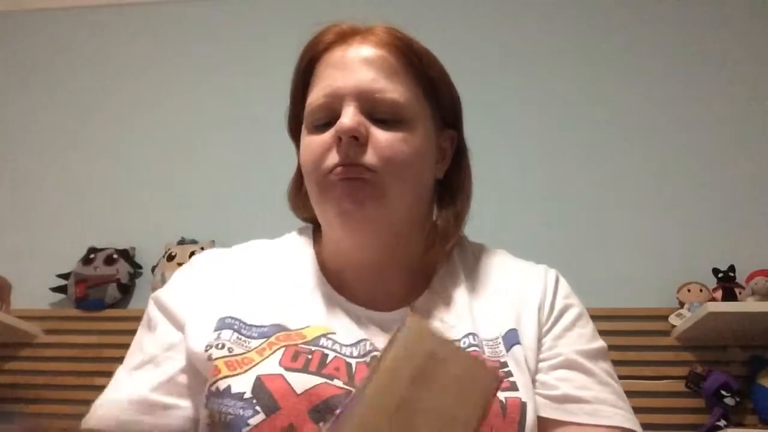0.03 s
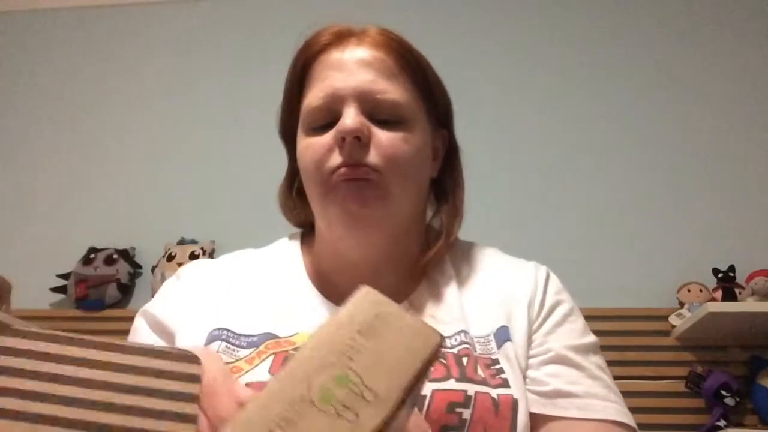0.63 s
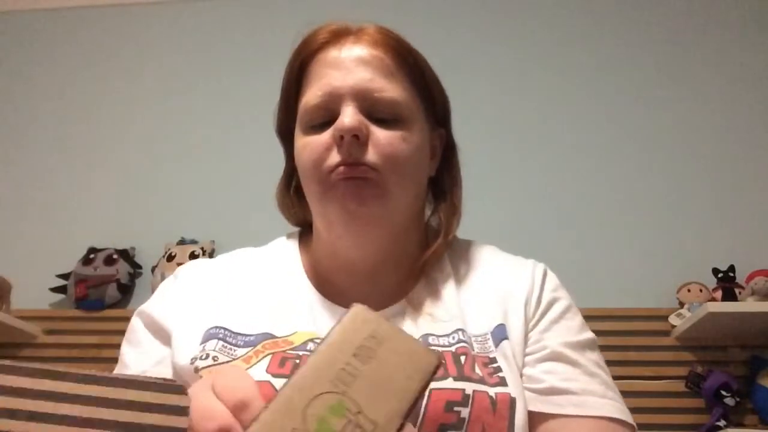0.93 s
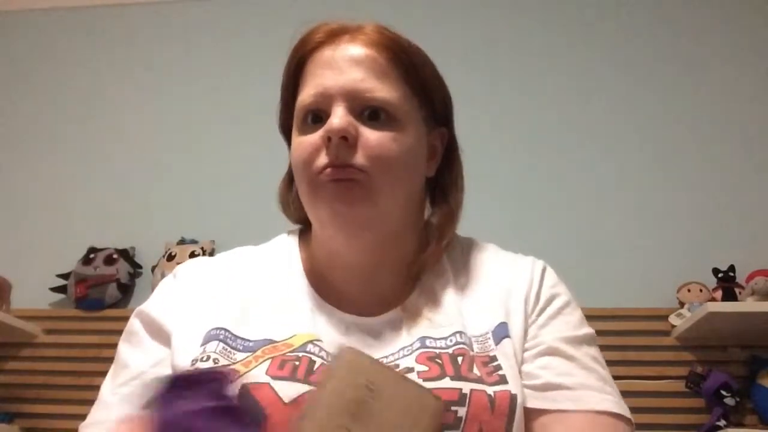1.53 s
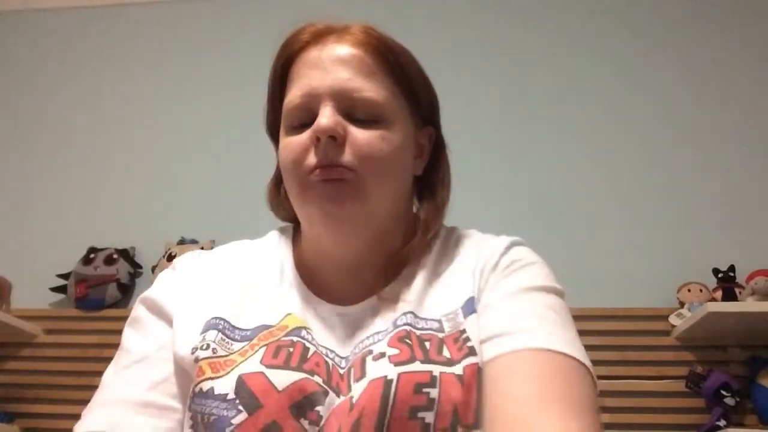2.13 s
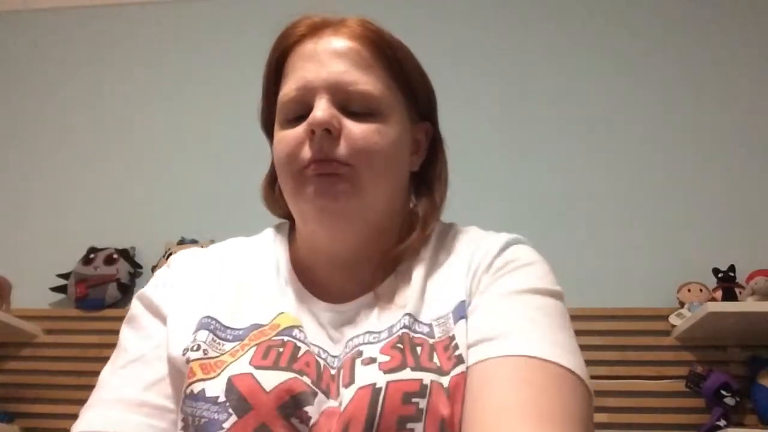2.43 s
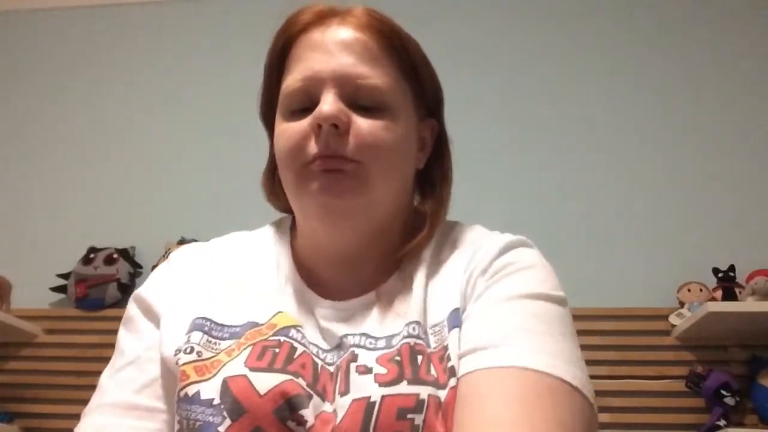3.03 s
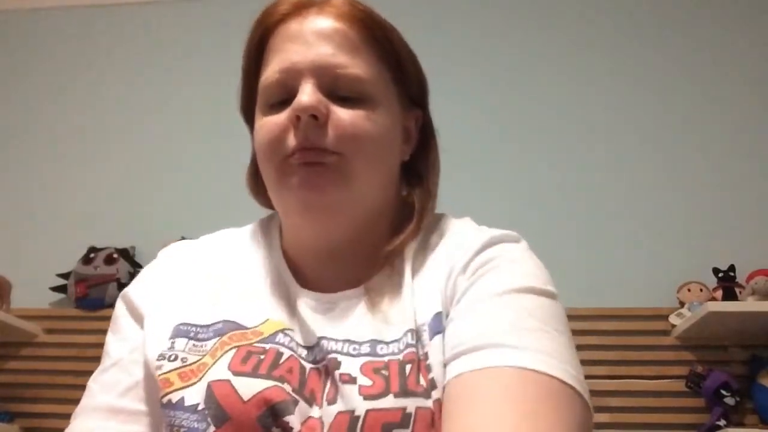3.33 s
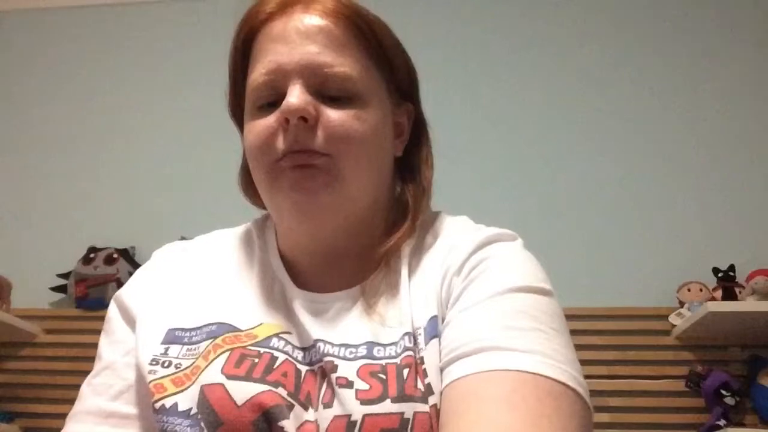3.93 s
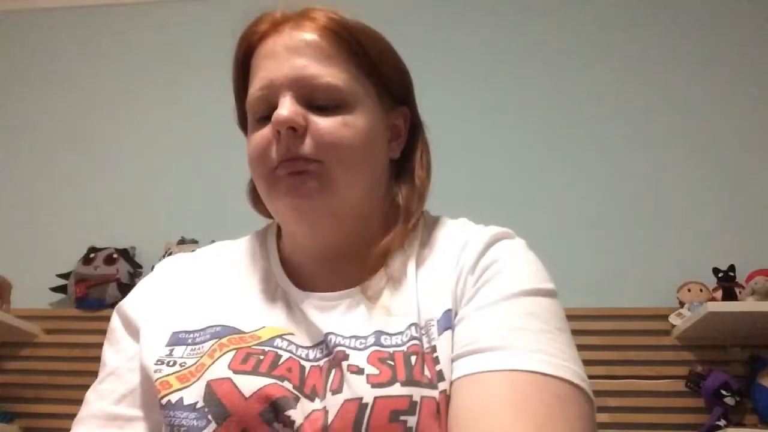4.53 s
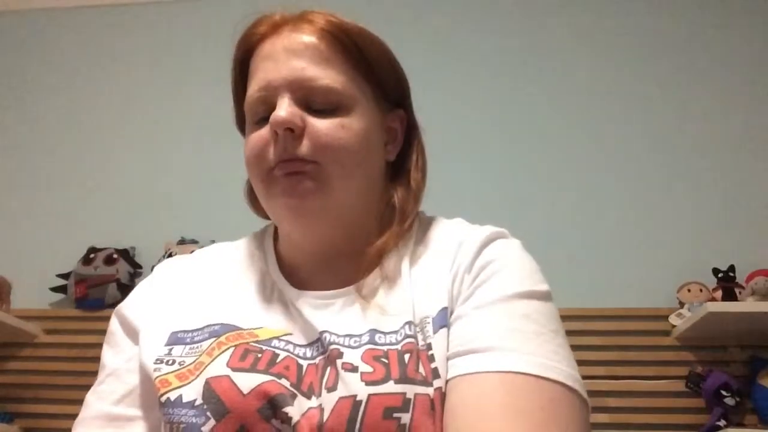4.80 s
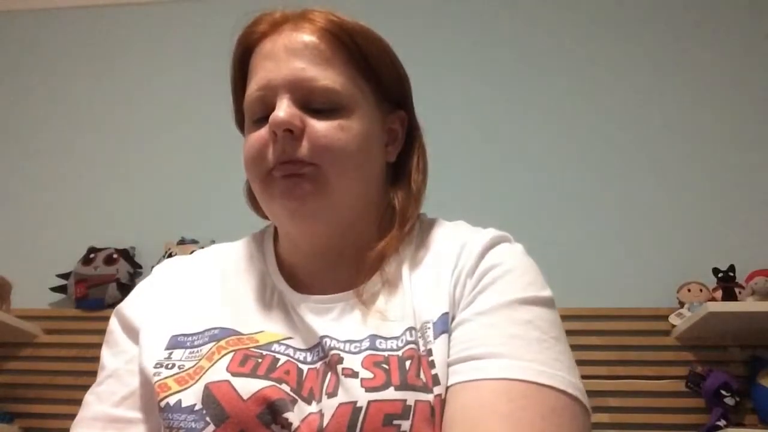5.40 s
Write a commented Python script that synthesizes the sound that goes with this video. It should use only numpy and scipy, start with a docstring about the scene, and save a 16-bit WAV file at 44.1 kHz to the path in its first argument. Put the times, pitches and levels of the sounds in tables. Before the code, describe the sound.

Soft paper rustling and a few hollow cardboard knocks give way to crisp tissue crinkling and snaps in a small room.

```python
"""A small room: someone sets a paper parcel aside, reaches into a cardboard box and opens its tissue.
Sliding sheets whisper with countless tiny slips, and dragged edges sing briefly. Things knock against
the box, ringing its walls and thumping its low modes. Then the tissue is pulled open and handfuls of
creases buckle in dense crinkling, the largest with a snap. A low hum swells and sinks under room hiss."""
import sys
import numpy as np
from scipy import signal
from scipy.fft import rfft, irfft
from scipy.io import wavfile
from scipy.ndimage import uniform_filter1d

SR = 44100
rng = np.random.default_rng(int(sys.argv[2]) if len(sys.argv) > 2 else 0)


def int16_out(signal):
    """Quantize to a 16-bit WAV file."""
    q = np.round(np.clip(np.atleast_2d(signal).T, -1, 1) * 32767)
    wavfile.write(sys.argv[1], SR, q.astype(np.int16))


N = 249606


def undb(db):
    """Decibels to gain."""
    return 10 ** (np.asarray(db) / 20)


def unit(x):
    """Scale to rms 1."""
    return x / np.sqrt(np.mean(x ** 2))


def crest(x):
    """Scale to peak 1."""
    return x / np.max(np.abs(x))


def steady(x):
    """Hold the rms at 1 over about 60 ms, keeping the fine grain."""
    return x / np.sqrt(np.abs(uniform_filter1d(x ** 2, size=2600)) + 1e-12)


def walk(rate_hz):
    """Random modulation that glides to a new value rate_hz times a second; spread near 1."""
    hold = max(int(SR / rate_hz), 1)
    steps = rng.standard_normal(N)[np.arange(N) // hold]
    return 1.33 * uniform_filter1d(steps, hold)


def colour(x, curve):
    """Minimum-phase EQ along (freq_hz, gain_db) points, so clicks keep their sharp front."""
    hz, db = np.transpose(curve)
    size = 4096
    bins_hz = np.maximum(np.fft.rfftfreq(size, 1 / SR), 1)
    gain = undb(np.interp(np.log(bins_hz), np.log(hz), db))
    cepstrum = irfft(np.log(gain))
    cepstrum[1:size // 2] *= 2
    cepstrum[size // 2 + 1:] = 0
    response = irfft(np.exp(rfft(cepstrum)))
    return signal.fftconvolve(x, response)[:len(x)]


def ring(x, hz, q):
    """One damped resonance."""
    hz = min(hz, SR / 3)
    return signal.lfilter(*signal.iirpeak(hz, max(q, 3 * hz / SR), fs=SR), x)


def add(out, start_s, sound):
    """Mix a sound in at start_s."""
    i = max(int(start_s * SR), 0)
    out[i:i + len(sound)] += sound[:len(out) - i]


def effort(moves):
    """Envelope in dB of hand movements: each swells, holds and dies away; overlaps add in power."""
    t, power = np.arange(N) / SR, 1e-14
    for start_s, hold_s, level_db, attack_s, release_s in moves:
        fade = np.maximum(start_s - t, 0) / attack_s + np.maximum(t - start_s - hold_s, 0) / release_s
        power = power + (undb(level_db) * np.exp(-fade)) ** 2
    return 10 * np.log10(power)


def room(x, echo_db, tail_db, t60_s):
    """Desk and walls answer within milliseconds; a short diffuse tail follows."""
    # early reflections off nearby surfaces: delay_s, gain_db
    echoes = [(.0092, -21.5), (0.0121, -11), (0.0138, -20), (.0225, -7)]
    t = np.arange(SR // 2) / SR
    fade_in = np.clip(t / 0.0069 - .5, 0, 1)
    tail = rng.standard_normal(len(t)) * undb(-60 * t / t60_s) * fade_in
    tail_eq = [(100, -7.0), (700, -13.0), (4000, -9.5), (15000, -1.5)]
    response = colour(tail / np.linalg.norm(tail), tail_eq) * undb(tail_db)
    response[0] += 1  # direct sound
    for delay_s, gain_db in echoes:
        add(response, delay_s, undb([gain_db + echo_db]))
    return signal.fftconvolve(x, response)[:N]


def room_hiss(level_db=-70):
    """A faint bed of noise, weighted to the low end."""
    # room tone spectrum: freq_hz, gain_db
    air_eq = [(25, -7.5), (60, 0), (110, 4), (200, -7.5), (400, -7.5), (1000, -26), (3000, -19.5),
              (8000, -26.5), (15000, -30)]
    return undb(level_db) * unit(colour(rng.standard_normal(N), air_eq))


def hum(pitch_hz=95, level_db=-65.5):
    """A low, slightly wavering tone that sinks now and then."""
    # bell-shaped dips in the hum: middle_s, half_length_s, depth_db
    dips = [(2.387, .08, -34), (3.42, .04, -19), (3.657, 0.13, -17), (4.197, 0.09, -14)]
    t = np.arange(N) / SR
    dip_db = sum(depth_db * np.exp(-.5 * ((t - middle_s) / half_s) ** 2)
                 for middle_s, half_s, depth_db in dips)
    phase = 2 * np.pi * np.cumsum(pitch_hz + 0.6 * walk(4.9)) / SR
    return unit(np.sin(phase)) * undb(level_db + dip_db + 0.5 * walk(36))


def box_knocks():
    """A contact raps the damped walls; the whole box thumps in its two lowest modes."""
    # hits on the box, some paired or bouncing; click and thump are relative to the hit:
    # start_s, peak_db, cutoff_hz, click_db, thump_hz, thump_db
    contacts = [(.701, -49.5, 1700, -6, 195, 2.5), (0.833, -24, 3400, -6.5, 203, -14),
                (.969, -30, 3280, -13, 188, -18), (1.454, -48.5, 1310, -25, 183, -5),
                (1.743, -44, 1170, -30, 170, -11), (2.130, -25, 4200, -20, 180, -32),
                (2.263, -26, 13600, -26, 300, -6), (2.269, -21.5, 4100, -15, 171, -20),
                (2.917, -21.5, 1640, -28, 163, -15.5), (2.926, -35.5, 1350, -30, 165, -30),
                (2.941, -30.5, 1300, -28, 283, -13), (3.380, -41, 2670, -12, 400, -1),
                (4.039, -47, 4180, -16, 432, -9), (4.267, -43.5, 920, -26, 292, -3.5),
                (4.563, -30, 750, -17, 161.4, 3), (4.564, -30.5, 3280, -9, 296, -23)]
    # modes of the cardboard walls: pitch_hz, width_hz, gain_db
    wall_modes = [(710, 20, 7.5), (824, 24, 9.5), (1530, 63, -1), (1900, 220, -16), (2200, 370, 0.5),
                  (3600, 120, -11), (5770, 3400, 4)]
    spot_ratio, decay_cycles = 0.43, 2.05
    raps, thumps, t = np.zeros(N), np.zeros(N), np.arange(8192) / SR
    for start_s, peak_db, cutoff_hz, click_db, thump_hz, thump_db in contacts:
        push = (t == 0) + 0.089 * rng.standard_normal(len(t)) * np.exp(-t / 0.0041)
        softness = signal.butter(5, min(cutoff_hz, SR / 3), fs=SR, output="sos")
        force = signal.sosfilt(softness, push) + undb(click_db) * push
        # a harder contact flexes a smaller, higher-pitched spot
        flex = ring(force, spot_ratio * cutoff_hz, q=1.18)
        walls = sum(undb(db) * ring(flex, hz, q=hz / width_hz) for hz, width_hz, db in wall_modes)
        add(raps, start_s, undb(peak_db) * crest(flex + walls))
        phase = 2 * np.pi * thump_hz * t
        low_modes = np.sin(phase) - undb(-13.5) * np.sin(1.83 * phase)
        envelope = np.exp(-t * thump_hz / decay_cycles) * (1 - np.exp(-t / 0.0022))
        add(thumps, start_s, undb(peak_db + thump_db) * low_modes * envelope)
    return raps, thumps


def edge_drags():
    """An edge sticks and slips over card or paper, and one patch of the sheet sings briefly."""
    # dragged edges: middle_s, half_length_s, level_db, pitch_hz
    drags = [(0.08, 0.023, -73, 590), (0.268, 0.022, -71.5, 670), (2.56, 0.016, -62, 584),
             (1.403, 0.1, -61, 807), (1.515, 0.025, -52.5, 3130), (1.847, 0.1, -60.5, 760),
             (2.053, 0.083, -56, 3600), (2.137, 0.027, -48, 1620), (2.71, 0.037, -59, 1200),
             (3.08, 0.032, -60, 1810), (3.594, .07, -68.5, 1900), (4.147, 0.035, -60.5, 1560),
             (4.673, 0.045, -58, 415)]
    out, t = np.zeros(N), np.arange(N) / SR
    for middle_s, half_s, level_db, pitch_hz in drags:
        slips = rng.standard_normal(N) * undb(2 * walk(280))
        tone = ring(ring(slips, pitch_hz, q=2.9), pitch_hz, q=2.9)
        swell = np.exp(-.5 * ((t - middle_s) / half_s) ** 2)
        out += unit(tone) * undb(level_db) * swell
    return out


def rub():
    """The dull side of moving paper: broad areas catching and letting go."""
    # low body of a moving sheet: freq_hz, gain_db
    rub_eq = [(40, -16), (90, -2), (170, -2), (300, -3), (500, -1), (780, 1.5), (1050, -4), (1400, -2.5),
              (2200, -23.5)]
    catches = rng.standard_normal(N) * undb(1.73 * walk(300))
    return steady(colour(catches, rub_eq))


def creases(per_s, spread_db, tint_db, q):
    """A shower of tiny buckling clicks; each rings the facets around it with its own mix of pitches."""
    size_db = spread_db * np.minimum(rng.exponential(size=N), 4.5)
    clicks = (rng.random(N) < per_s / SR) * undb(size_db) * rng.choice([-1, 1], N)
    out = 0
    for facet_hz in np.geomspace(700, 15000, 12):
        tint = undb(tint_db * np.clip(rng.standard_normal(N), -2, 2)) * rng.choice([-1, 1], N)
        flicker = undb(2.72 * walk(70) + 2.0 * walk(9))  # the facets keep changing shape
        out = out + ring(clicks * tint, facet_hz, q) * flicker
    return unit(out)


def sliding(sheen_hz=7000):
    """Sheets drag over each other: countless slips merge into a whisper; stray creases tick on top."""
    # hand strokes: start_s, hold_s, level_db, attack_s, release_s, brightness_db
    strokes = np.array([(0.01, 0.027, -66.5, 0.032, 0.11, -3), (.23, 0.016, -72.5, .03, 0.039, 0),
                        (0.56, 0.013, -76.5, .04, .04, 2), (.704, 0.018, -58.5, 0.0027, .13, -6),
                        (1.267, 0.043, -53.5, 0.22, 0.054, 0.5), (1.394, 0.098, -53.5, 0.033, 0.04, 3.5),
                        (1.492, 0.028, -51, 0.024, 0.31, 5), (1.836, 0.039, -52, 0.096, 0.01, -5),
                        (1.931, 0.24, -52.5, 0.021, 0.077, 3.5), (2.127, 0.012, -47, 0.0064, 0.027, 1.5),
                        (2.272, 0.055, -54, 0.12, 0.064, -4), (2.437, 0.054, -53.5, 0.13, 0.063, -9),
                        (2.699, 0.046, -51, 0.1, 0.13, -5.5), (2.89, 0.085, -46, 0.034, 0.036, -4),
                        (3.04, 0.088, -56, 0.062, 0.056, -3), (3.237, 0.045, -68, 0.027, 0.2, 5.5),
                        (3.445, 0.16, -70, 0.06, 0.099, -7), (4.106, 0.17, -56.5, 0.01, 0.075, -6),
                        (4.356, 0.15, -65, 0.023, .05, 2.5)])
    # tone of sliding paper: freq_hz, gain_db
    slide_eq = [(590, -55), (1000, -2), (1350, 1), (2080, -0.5), (2390, -1.5), (2590, -3), (3180, 0),
                (6480, -3), (7880, -3.5), (13800, -9), (15500, -18)]
    resting_db = -81.5  # the paper stirs a little under the resting hand
    stroke_db = np.maximum(effort(strokes[:, :-1]), resting_db)
    bright_db = np.interp(np.arange(N) / SR, strokes[:, 0], strokes[:, -1])
    slips = steady(colour(creases(per_s=9000, spread_db=1.0, tint_db=4, q=1.56), slide_eq))
    sheen = signal.sosfiltfilt(signal.butter(1, sheen_hz, "high", fs=SR, output="sos"), slips)
    whisper = undb(stroke_db - 0.3) * (slips + (undb(bright_db) - 1) * sheen)
    # ticks and rub fade less than the whisper: a light touch is duller, and its ticks stand out
    strays = colour(creases(per_s=120, spread_db=1.0, tint_db=5.0, q=3.5), slide_eq)
    ticks = unit(strays) * undb(0.66 * stroke_db - 30.5)
    rub_db = -57 + 0.61 * (stroke_db - stroke_db.max())
    return whisper + undb(rub_db) * rub() + ticks


def crease_snaps():
    """Larger creases pop through, each within a millisecond or two."""
    # the loudest single creases: start_s, peak_db, centre_hz
    snaps = [(0.567, -53, 1900), (2.544, -45.5, 3530), (3.129, -40, 5000), (3.28, -54, 1620),
             (3.345, -53, 4300), (3.489, -47, 3040), (3.649, -49, 5940), (3.920, -43.5, 3460),
             (4.438, -41, 4460), (4.461, -34, 4220), (4.893, -31, 5500), (4.987, -33.5, 1880),
             (5.235, -26.5, 4440), (5.280, -26, 4800), (5.305, -23, 4200), (5.319, -24.5, 5900),
             (5.320, -25, 7060)]
    out, t = np.zeros(N), np.arange(1024) / SR
    for start_s, peak_db, centre_hz in snaps:
        burst = rng.standard_normal(len(t)) * np.exp(-t / 0.0011)
        pop = ring(ring(burst, centre_hz, q=1.0), centre_hz, q=0.8)
        add(out, start_s, undb(peak_db) * crest(pop))
    return out


def crinkling(crackle_db=-10):
    """Tissue is pulled open: fine creases give way, faster under a harder pull; stiffer ones crackle."""
    # pulls on the tissue: start_s, hold_s, level_db, attack_s, release_s
    pulls = [(4.47, 0.081, -53.5, 0.025, .03), (4.558, 0.053, -42, 0.015, 0.013),
             (4.672, 0.01, -50.5, 0.033, 0.035), (4.75, 0.044, -41, 0.045, 0.086),
             (4.897, 0.049, -45, 0.013, 0.065), (4.985, 0.038, -50.5, 0.025, 0.038),
             (5.052, 0.11, -37.5, 0.022, 0.032), (5.305, 0.063, -40, 0.055, 0.04),
             (5.475, 0.036, -36.5, 0.072, 0.05), (5.575, 0.028, -44, 0.036, 0.057),
             (5.645, .03, -51, 0.0061, .03)]
    # tone of buckling tissue: freq_hz, gain_db
    tissue_eq = [(530, -30), (1000, -20), (1380, -5), (1670, -1.5), (2000, -3.5), (2500, -6.5), (3300, -4),
                 (4440, -1.5), (5310, -4.5), (6200, -4.5), (9500, -7.5), (13300, -12.5), (15500, -17)]
    pull_db = effort(pulls)
    force_db = pull_db - pull_db.max()  # 0 at the hardest pull
    buckles = creases(per_s=5000 * undb(0.33 * force_db), spread_db=0.0, tint_db=-0.5, q=2.2)
    fine = steady(colour(buckles * undb(0.26 * walk(90)), tissue_eq))
    stiff = unit(colour(creases(per_s=170, spread_db=-0.5, tint_db=4, q=2.6), tissue_eq))
    crinkle = undb(-0.4) * fine + undb(crackle_db) * stiff
    flutter = undb(-55.5 + 0.39 * force_db) * rub()  # the whole sheet flutters low underneath
    return undb(pull_db) * crinkle + flutter


def scene():
    """Sliding gives way to crinkling; the box sits lower down, so more of it arrives by the walls."""
    paper = sliding() + crinkling() + crease_snaps() + edge_drags()
    raps, thumps = box_knocks()
    close_paper = room(paper, echo_db=-14, tail_db=-10.5, t60_s=0.09)
    box_boom = room(thumps, echo_db=1, tail_db=-5.5, t60_s=0.2)
    box_raps = room(raps, echo_db=-6.5, tail_db=4.5, t60_s=0.12)
    return (close_paper + box_boom + box_raps + hum() + room_hiss())[None]


def record(dry):
    """The microphone thins the deep bass and cuts the top end steeply."""
    low_cut = signal.butter(2, 42, "high", fs=SR, output="sos")
    high_cut = signal.ellip(10, .2, 70, 15400, fs=SR, output="sos")
    return signal.sosfilt(high_cut, signal.sosfilt(low_cut, dry))


dry = scene()
out = record(dry)
int16_out(out)
```